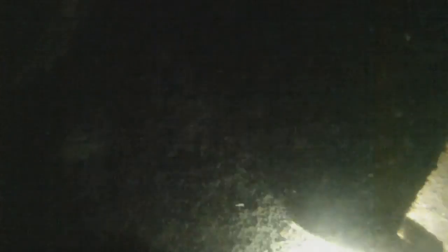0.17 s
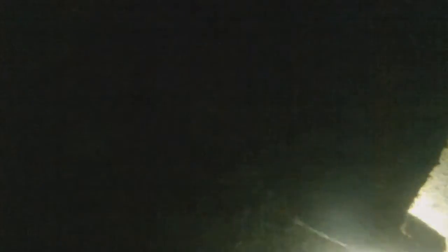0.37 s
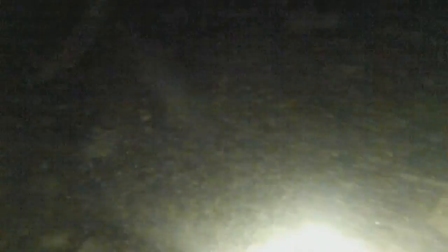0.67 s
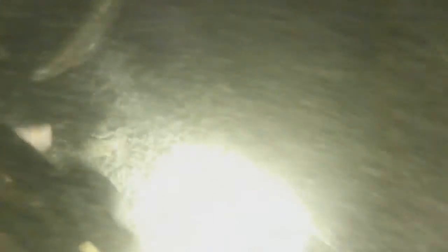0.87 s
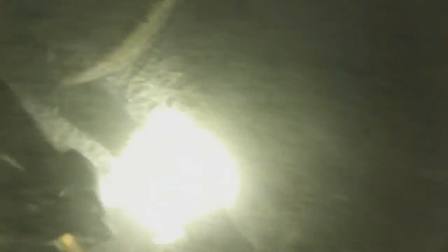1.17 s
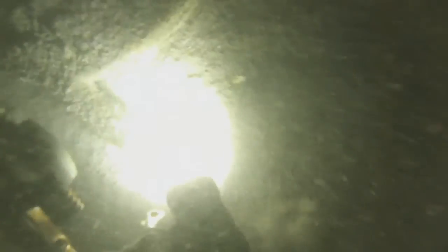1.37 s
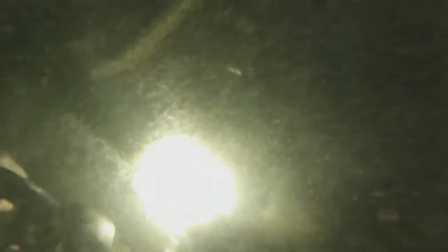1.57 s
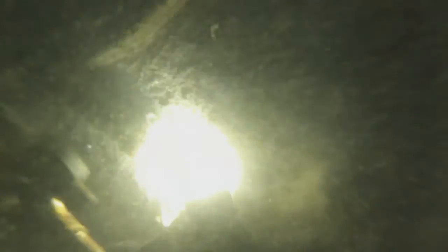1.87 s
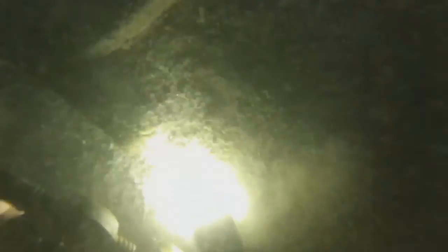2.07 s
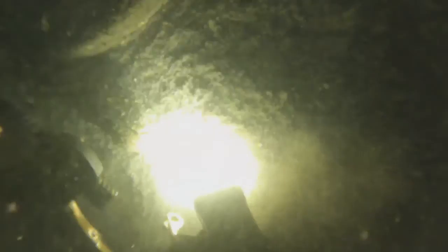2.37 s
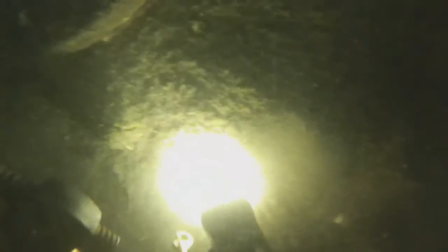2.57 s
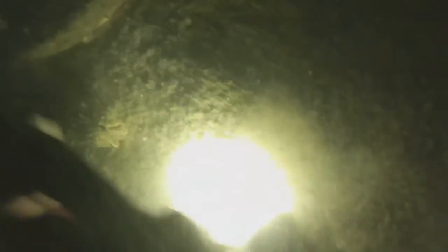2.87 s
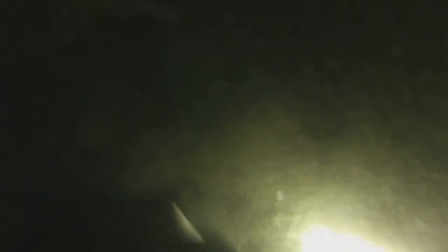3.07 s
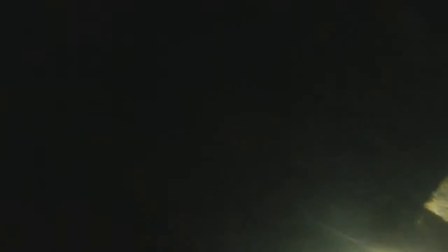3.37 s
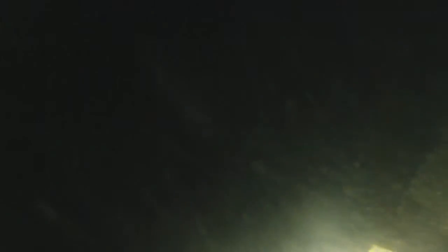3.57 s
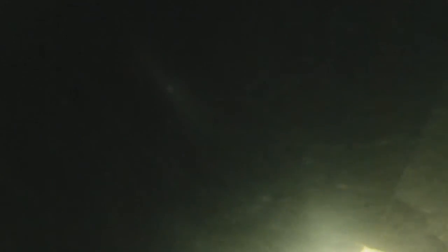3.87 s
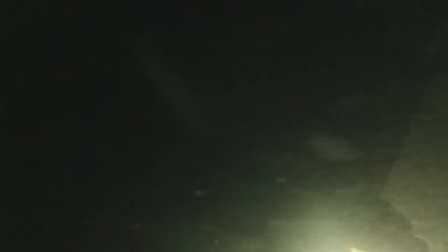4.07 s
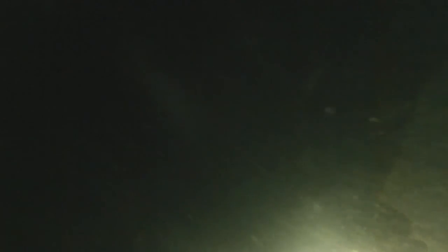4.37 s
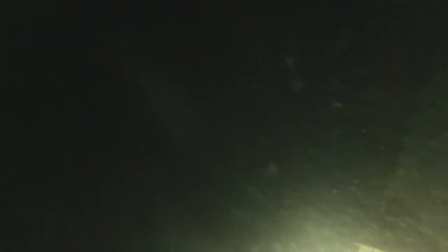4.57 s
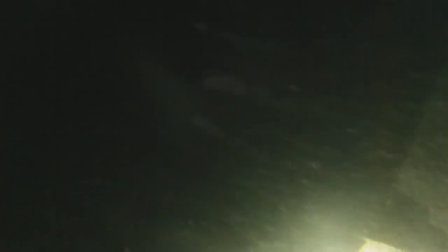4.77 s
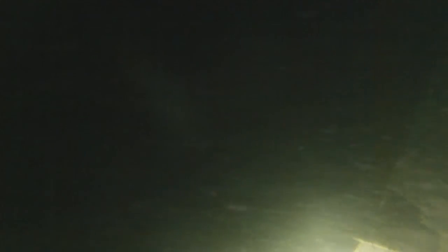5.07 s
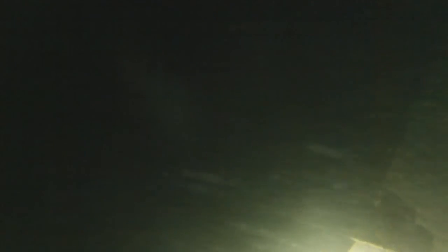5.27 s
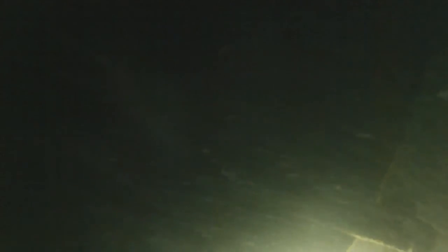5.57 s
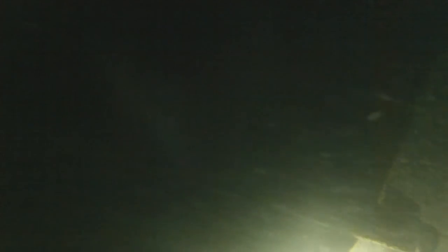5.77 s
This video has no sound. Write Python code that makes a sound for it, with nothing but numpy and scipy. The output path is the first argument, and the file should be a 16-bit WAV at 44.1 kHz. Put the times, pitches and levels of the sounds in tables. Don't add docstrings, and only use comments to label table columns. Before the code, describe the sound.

A small camera in a plastic housing underwater hears low rumbling water, faint hiss and a thin whine. Clips and buckles tick and clink, with hard knocks on the case in the first half. After three seconds the rattling fades to sparse ticks, while water bumps and sways the housing. A crisp snap comes near the end. Everything is very close and dry.

```python
import sys
import numpy as np
from scipy import signal
from scipy.fft import rfft, irfft
from scipy.io import wavfile
from scipy.ndimage import uniform_filter1d

SR = 44100
rng = np.random.default_rng(int(sys.argv[2]) if len(sys.argv) > 2 else 0)


def wav_record(signal):
    frames = np.transpose(np.atleast_2d(signal))
    bounded = np.clip(frames, -1, 1)
    quanta = np.round(bounded * 32767).astype(np.int16)
    wavfile.write(sys.argv[1], SR, quanta)


def boost_factor(decibels):
    exponent = np.asarray(decibels, float) / 20
    return 10 ** exponent


N = 260631

# f/Hz, level per Hz/dB
HISS = [(88, -28.5), (150, -4), (637, -10.5), (1210, -14), (1720, -10), (2140, -16), (2650, -14.5),
        (4580, -17.5), (5050, -17), (5910, -20), (11900, -22.5), (15100, -25.5), (16000, -47)]
# f/Hz, level/dB
WHINE = [(5039, -74.5), (7560, -84), (8823, -85), (11294, -90), (15122, -84.5)]
HISS_DB = -65.5
STRAP_DB, STRAP_STOPS_S, STRAP_FADE_DB_S = -65.5, 0.3, 102
WHINE_IDLE_DB, WHINE_BUSY_DB = -7.0, -1.0
BUSY_S, BUSY_RAMP_S = (0.65, 3.25), 0.614

# t/s, deep push level/dB
PUSH = [(0, -52), (.45, -48), (.65, -55.5), (1.1, -49.5), (2, -43.5), (3, -47), (3.4, -50), (4.1, -52.5),
        (4.5, -49), (5.3, -47.5), (5.91, -57.5)]
SLOSH_DB, SLOSH_FOLLOWS = -64, 1

# f/Hz, level/dB, time to fall 60 dB/s
WALL = [(1306, -1, 0.016), (1497, -3.5, 0.041), (1640, -2.5, 0.033), (1810, -0.5, 0.024),
        (2073, 2.5, 0.023), (2405, 5.5, 0.012), (2750, 4, 0.023)]
# f/Hz, level/dB, time to fall 60 dB/s
LATCH = [(3350, -13, 0.032), (3625, -9, 0.039), (4213, -1.5, 0.025), (4660, -1.5, .015), (5180, 1, 0.017)]
# f/Hz, level/dB, time to fall 60 dB/s
BUCKLE = [(6500, -1, 0.018), (7300, 3.5, 0.015), (7600, -5, 0.0069), (8560, -7, 0.026)]
# f/Hz, level/dB, time to fall 60 dB/s
PIN = [(10250, -13, .012), (11260, 1, .011), (12300, -17, .011), (13950, -8, .018), (14900, -24, .012)]
# lowest f/Hz, highest f/Hz
BANDS_HZ = [(1150, 3200), (3200, 6000), (6000, 9500), (9500, 12200)]

# t/s, length/s, best heard f/Hz, level/dB
SCRAPES = [(0, 0.054, 1470, -63), (0.316, 0.026, 8440, -35.5), (0.405, 0.033, 1670, -28.5),
           (0.442, 0.072, 4230, -58), (0.998, 0.15, 2130, -66), (1.258, 0.13, 4120, -65),
           (1.408, 0.033, 4130, -47), (1.622, 0.089, 4150, -57), (1.828, 0.053, 3940, -56.5),
           (2.007, 0.054, 7300, -50), (2.094, 0.038, 4400, -40), (2.872, 0.02, 2230, -51),
           (2.923, 0.026, 5420, -43.5), (2.924, 0.29, 1920, -68), (3.192, 0.028, 5200, -45.5),
           (3.696, 0.048, 2777, -62.5), (3.858, 0.12, 2814, -67.5), (4.106, 0.062, 3590, -66.5),
           (4.32, 0.083, 2780, -62), (4.639, 0.036, 4300, -76.5), (5.672, 0.05, 1660, -61.5),
           (1.009, 0.06, 3650, -64), (1.04, 0.055, 2190, -62), (1.134, 0.09, 4210, -63.5),
           (1.468, 0.36, 4300, -62), (1.714, 0.12, 8650, -70), (2.117, 0.059, 7500, -61),
           (2.344, 0.19, 4500, -65), (2.522, 0.036, 2400, -50), (2.932, 0.045, 5100, -61),
           (2.977, .035, 2280, -71), (3.055, 0.029, 1880, -73)]

# t/s, f/Hz, swing level/dB, time to fall 60 dB/s
THUDS = [(0.026, 400, -41, 0.0092), (0.417, 100, -32.5, 0.12), (0.42, 445, -27.5, 0.038),
         (1.621, 445, -29.5, 0.064), (1.624, 114, -30.5, 0.078), (1.686, 186, -33.5, 0.17),
         (1.687, 486, -35, 0.05), (1.704, 517, -40, 0.07), (2.088, 480, -30.5, 0.021),
         (2.088, 903, -28.5, 0.063), (2.51, 928, -33, 0.052), (2.111, 317, -31.5, 0.075),
         (2.143, 111.4, -36, 0.21), (2.509, 319, -27.5, 0.067), (2.551, 110.4, -39.5, 0.29),
         (2.911, 294, -28, 0.0084), (2.954, 70.9, -35, 0.16), (3.061, 601, -43.5, 0.06)]
# t/s, f/Hz, swing level/dB
JOLTS = [(0.704, 90.5, -38.5), (1.032, 155, -39), (3.278, 119.6, -37), (3.564, 113.6, -32.5),
         (3.919, 100.4, -38), (4.221, 87.2, -40), (4.445, 129.7, -40.5), (4.792, 128.2, -42.5),
         (4.847, 140, -37), (5.006, 55.7, -28.5), (5.101, 131.5, -26), (5.461, 149.8, -36.5)]
# t/s, swing level/dB, time to fall 60 dB/s
SWAYS = [
    (3.583, -34, 0.33),
    (4.23, -37, 0.15),
    (4.454, -37.5, 0.27),
    (5.26, -37, 0.22),
    (5.396, -39.5, 0.38),
    (5.472, -28.5, 0.42),
]
JOLT_SWINGS, SWAY_HZ = 6.4, 43.9

# t/s, f/Hz, peak level/dB, time to fall 60 dB/s
TAPS = [(.0295, 750, -38, .004), (.031, 1720, -41.5, 0.031), (.0868, 800, -40, 0.0049),
        (.089, 1700, -41.5, .015), (.1135, 600, -57, .005), (.408, 730, -33, 0.025),
        (.4195, 760, -29.5, 0.026), (.4221, 2620, -11, 0.0018), (1.6215, 1223, -16, 0.016),
        (1.629, 2590, -13.5, 0.013), (1.6315, 2000, -19, .015), (1.688, 540, -36, .04),
        (1.7, 596, -45, .06), (1.733, 1700, -45.5, .02), (2.0885, 2610, -3.5, 0.03),
        (2.0892, 2750, -6, 0.014), (2.0335, 3600, -14, .018), (2.0395, 2300, -33, 0.0084),
        (2.0395, 8000, -29, 0.0053), (2.5165, 2650, -12.5, 0.01), (2.884, 7000, -32, .005),
        (2.883, 2700, -31.5, 0.0062), (3.0128, 3300, -23, 0.0094), (2.912, 4500, -29, .004),
        (5.8488, 3200, -27.5, 0.0068), (5.854, 5300, -35, .012), (.3257, 2200, -35.5, 0.021),
        (2.5085, 297, -24, 0.022), (2.5097, 2620, -7, .014), (2.5255, 7800, -40, .006),
        (2.9114, 1470, -19, 0.0025), (2.9238, 7300, -7, .006), (2.9238, 8500, -16, .012),
        (2.9253, 6560, -18, 0.0033), (2.9253, 3440, -22, 0.0083), (2.9345, 6500, -34, .004),
        (2.942, 9500, -42, .003), (2.942, 5000, -33, .004), (2.9565, 9000, -40, .003),
        (2.9565, 5000, -44, .005), (3.0135, 6500, -41, .003), (3.0605, 9500, -32, 0.0033),
        (5.69, 4260, -53.5, 0.024), (5.69, 1690, -52.5, .02), (5.8501, 6700, -7, 0.0058),
        (5.8501, 10400, -21, 0.0079), (5.8503, 4400, -21.5, 0.0079), (5.8715, 7500, -44, 0.016),
        (5.8715, 11100, -49, 0.0099)]

# t/s, best heard f/Hz, wall/dB, latch/dB, buckle/dB
HEAVY = [(0.4166, 6550, -22, -27.5, -27), (0.421, 2780, -21.5, -14.5, -39),
         (1.6181, 5240, -40.5, -36.5, -47), (1.6218, 1338, -12, -19, -36.5),
         (1.624, 11230, -15.5, -18, -13.5), (1.6272, 8450, -15.5, -17.5, -13),
         (1.629, 2600, -13.5, -19.5, -16.5), (1.633, 1900, -18.5, -33.5, -33), (1.645, 4250, -33, -28, -30),
         (2.088, 2767, -1, -5, -11.5), (2.095, 1895, -7, -10.5, -14), (2.102, 1895, -13, -29, -33.5),
         (2.119, 4700, -24.5, -23, -27), (2.5093, 4624, -7.5, -16, -19), (2.5102, 2735, -4.5, -13.5, -29),
         (2.5161, 1820, -8.5, -17, -30), (2.522, 1820, -17, -34, -50), (2.5253, 7700, -20, -40, -39),
         (2.92, 7300, -27.5, -34.5, -35)]
# t/s, best heard f/Hz, wall/dB, latch/dB
LATCH_HITS = [(.389, 7300, -52, -41), (.408, 1640, -26, -28), (.4384, 2600, -28, -30),
              (.4585, 1590, -40, -50), (.4687, 1620, -41, -49), (1.0596, 2950, -38, -33),
              (1.0832, 2190, -49, -40), (1.114, 4160, -25, -21.5), (1.1226, 2210, -24.5, -21.5),
              (1.3935, 4100, -43.5, -40), (1.4005, 3600, -53, -42), (1.409, 4300, -62, -41),
              (1.8361, 3500, -40.5, -40.5), (2.0322, 7500, -33, -23.5), (2.2467, 4430, -40, -31.5),
              (2.2573, 4700, -39, -44), (2.2802, 1637, -44, -57.5), (2.934, 2745, -29.5, -36),
              (2.9535, 5100, -71, -40.5), (2.9807, 3100, -36, -45), (2.9956, 3930, -36, -41),
              (3.0135, 3080, -25.5, -37.5), (3.0655, 1820, -40, -48), (3.0826, 2070, -30, -28),
              (3.09, 4200, -44.5, -38), (3.1981, 5180, -40, -31), (3.339, 7250, -40, -37.5),
              (3.358, 4270, -48.5, -43), (3.4534, 4300, -45.5, -32), (4.1739, 3637, -45.5, -37)]
# t/s, best heard f/Hz, wall/dB, buckle/dB
BUCKLE_HITS = [(.3018, 5250, -56, -31.5), (.31, 8100, -51, -38), (.3169, 5200, -58, -25),
               (.3272, 11640, -47, -15.5), (.4354, 1606, -30, -46), (.4795, 10700, -46, -35),
               (.5201, 7180, -35, -22.5), (.9923, 6300, -42.5, -28), (1.0715, 2130, -58, -44),
               (1.1313, 8580, -54, -32), (1.4205, 8520, -34.5, -21), (1.4372, 8500, -47, -31.5),
               (1.671, 8620, -46, -37), (1.6872, 2600, -39, -40), (1.8434, 8700, -61, -29.5),
               (1.8476, 8610, -61, -28), (2.0045, 8600, -65, -29.5), (2.0168, 8600, -46.5, -27.5),
               (2.028, 3530, -39.5, -20.5), (2.1434, 7730, -46, -45.5), (2.9225, 7510, -36, -20.5),
               (3.06, 1745, -34, -43), (3.4682, 6845, -38, -28), (3.9378, 8620, -60, -36)]
# t/s, best heard f/Hz, wall/dB
WALL_TICKS = [(.0311, 1700, -48), (.0863, 1690, -56), (.115, 1740, -60), (1.0953, 2270, -54),
              (1.1752, 2520, -45.5), (1.2856, 2960, -62), (1.2913, 3120, -48.5), (1.3334, 2440, -47.5),
              (1.3602, 1550, -49), (1.562, 1664, -43.5), (3.116, 2350, -42.5), (3.7128, 7600, -52),
              (4.2156, 1496, -47.5), (4.345, 2750, -51), (5.6841, 2110, -50)]
# t/s, best heard f/Hz, fittings/dB
GEAR_TICKS = [(.5106, 8670, -40), (1.3115, 5510, -46), (1.535, 7470, -49), (1.583, 4900, -44),
              (1.7326, 3580, -47.5), (1.7823, 4213, -53), (1.8252, 3650, -44.5), (2.0737, 4290, -39),
              (2.1963, 5000, -48), (2.2414, 5030, -48.5), (2.357, 7700, -49.5), (2.407, 4980, -46),
              (2.4459, 7800, -43), (2.495, 7700, -50.5), (2.545, 10500, -49), (2.687, 7670, -48.5),
              (2.747, 3640, -50.5), (2.793, 4370, -50), (3.071, 5790, -47.5), (3.2423, 5500, -47),
              (3.3876, 7350, -48), (3.855, 5180, -46), (4.082, 5110, -50.5), (4.16, 7430, -44.5),
              (4.6618, 7540, -50)]
# t/s, best heard f/Hz, wall/dB, latch/dB, buckle/dB
SNAPS = [(0.4221, 1640, -16, -11.5, -5), (0.451, 11240, -44.5, -43, -33.5),
         (0.6034, 7480, -56, -47.5, -38.5), (1.661, 5480, -36, -33.5, -48), (1.693, 2000, -36, -40, -37),
         (1.7054, 4620, -41.5, -48, -50), (1.7637, 8660, -51, -41.5, -34),
         (1.8056, 6700, -71.5, -51, -39.5), (1.8534, 11270, -45, -36.5, -31.5),
         (1.869, 11130, -53, -43, -39.5), (2.078, 4160, -43.5, -42.5, -39), (2.4199, 4530, -64, -44, -45),
         (2.697, 4270, -45, -42, -57), (2.885, 5120, -32, -28.5, -34.5), (2.9113, 4780, -26, -25.5, -37),
         (5.8502, 7120, -37, -31, -14.5)]
LATCH_LED_DB, BUCKLE_LED_DB = (0.5, -5.5, -14.5), (-7, -2, -5.5)
# wall/dB, latch/dB, buckle/dB, pin/dB
WALL_TICK_DB = (0.0, -13, -15, -25)
# wall/dB, latch/dB, buckle/dB, pin/dB
GEAR_TICK_DB = (-9, -1.5, -3, -11.5)
SNAP_PIN_DB, HEAVY_PIN_DB = -9, -12
PIN_STRUCK_DB = 15.5
SNAP_CHATTER_S, SNAP_RING, SNAP_TAIL_DB = 0.0006, 0.66, -21.5
HEAVY_CHATTER_S, HEAVY_RING, HEAVY_TAIL_DB = 0.0018, 0.84, -6.5
LIGHT_TILT = 0.8
STRAY_COUNT, STRAY_DB = 45, -54.5

# t/s, f/Hz, peak
# level/dB, time to fall 60 dB/s
RINGS = [(.301, 8635, -39, .08), (1.407, 8700, -39, .08), (.302, 3625, -46, .08), (0.324, 3625, -20, 0.053),
         (0.424, 1495, -39, 0.26), (0.424, 1590, -36.5, 0.19), (0.44, 8650, -33, 0.077),
         (.523, 3670, -27, 0.037), (1.062, 2800, -31, 0.039), (1.421, 8640, -27, 0.07),
         (1.421, 2166, -33, 0.063), (1.423, 3680, -20, 0.03), (1.672, 8620, -36.5, 0.073),
         (1.847, 8560, -22, 0.048), (2.935, 2766, -22, 0.035), (3.014, 2750, -23, 0.043),
         (3.2, 2200, -42.5, 0.081), (3.2, 3530, -49, 0.1), (3.199, 8640, -36, 0.057),
         (.388, 2300, -44, 0.027), (.388, 4300, -49, .02), (.441, 3620, -31.5, 0.047),
         (1.07, 8900, -38, 0.021), (1.175, 2480, -58.5, 0.045), (1.283, 2910, -44.5, 0.072),
         (1.31, 4360, -61, .12), (1.31, 5500, -52, 0.045), (1.333, 2470, -39, 0.023),
         (1.36, 1700, -43, 0.049), (1.641, 3600, -27, 0.042), (2.879, 5240, -30, 0.027),
         (3.86, 2720, -49, 0.032), (3.874, 2730, -57, .03), (3.903, 2700, -56.5, 0.14),
         (3.94, 2170, -50, .05), (3.94, 3600, -63, 0.055), (4.094, 7400, -50, 0.028),
         (4.112, 2770, -53, .03), (4.128, 2750, -45, 0.038), (4.133, 8600, -50, 0.054),
         (4.174, 3686, -42, 0.044), (4.342, 2770, -46.5, 0.055), (4.359, 2750, -53.5, 0.047),
         (4.381, 2730, -46.5, 0.052), (4.356, 7500, -51.5, 0.035), (1.849, 3640, -35.5, 0.058),
         (3.098, 2170, -46, 0.058), (3.39, 7500, -48.5, 0.046), (3.39, 3620, -48, 0.046),
         (3.455, 2070, -40, 0.028),
         (.421, 1270, -12, 0.027), (.42, 2754, -9, 0.034), (1.62, 1485, -13, 0.038),
          (1.62, 1264, -15, 0.039), (1.629, 1620, -21.5, 0.054), (2.089, 2800, -5.5, 0.05),
          (2.149, 2750, -48, 0.066), (2.51, 2090, -6.5, 0.031), (2.515, 2310, -25, 0.011),
          (2.88, 2450, -25, 0.024), (3.083, 2110, -29, 0.025), (3.7, 692, -54, 0.07),
          (5.85, 2690, -18.5, 0.011), (1.422, 11600, -36, .025)]


def curve(table, col):
    rows = np.array(table)
    return np.interp(np.arange(N) / SR, rows[:, 0], rows[:, col])


def band(x, lo_hz, hi_hz, order=2):
    return signal.sosfilt(signal.butter(order, [lo_hz, hi_hz], "bandpass", fs=SR, output="sos"), x)


def noise_band(lo_hz, hi_hz, order=2, count=N):
    return unit(band(rng.standard_normal(count), lo_hz, hi_hz, order))


def unit(x):
    return x / np.sqrt(np.mean(x ** 2))


def add(out, s, x):
    i = max(int(s * SR), 0)
    out[i:i + len(x)] += x[:N - i]


def walk(rate):
    k = int(SR / rate)
    held = np.repeat(rng.standard_normal(N // k + 1), k)
    return unit(uniform_filter1d(uniform_filter1d(held, k), k)[:N])


def ring(hz, t60, rise_s, phase, count):
    t = np.arange(count) / SR
    fade = np.exp(-np.log(1000) * t / t60)
    return (1 - np.exp(-t / rise_s)) * fade * np.sin(2 * np.pi * hz * t + phase)


def camera():
    t = np.arange(N) / SR
    hz = np.maximum(np.fft.rfftfreq(N, 1 / SR), 1)
    hiss_hz, hiss_db = np.transpose(HISS)
    colour = boost_factor(np.interp(np.log(hz), np.log(hiss_hz), hiss_db))
    hiss = irfft(rfft(rng.standard_normal(N)) * colour, N)
    hiss = hiss / np.std(band(hiss, 1000, 15000, order=4))
    hiss = boost_factor(HISS_DB) * hiss

    whine = sum(boost_factor(db + 4.5 + 1.5 * walk(31)) * np.sin(2 * np.pi * f * t) for f, db in WHINE)
    busy = np.clip(np.minimum(t - BUSY_S[0], BUSY_S[1] - t) / BUSY_RAMP_S + 0.5, 0, 1)
    whine_db = 1.5 + WHINE_IDLE_DB + busy * (WHINE_BUSY_DB - WHINE_IDLE_DB)

    strap_db = STRAP_DB - STRAP_FADE_DB_S * np.maximum(t - STRAP_STOPS_S, 0) + 2.0 * walk(35)
    return hiss + boost_factor(whine_db) * whine + boost_factor(strap_db) * noise_band(7060, 7260)


def water():
    surge_db = 1.6 * walk(7)
    push_db = curve(PUSH, col=1)
    push = noise_band(24, 50) + boost_factor(-1.5) * noise_band(6, 30)
    slosh = noise_band(47, 160) + boost_factor(-7.5) * noise_band(180, 240)
    slosh_db = SLOSH_DB + SLOSH_FOLLOWS * (push_db + 50) + 1.2 * surge_db + 2.5 * walk(25)
    return boost_factor(push_db - 3.5 + surge_db) * push + boost_factor(slosh_db) * slosh


def scrapes(width=0.12):
    grains = rng.standard_normal(N) * boost_factor(4.5 * walk(250))
    modes = WALL[1::2] + WALL[-1:] + LATCH + BUCKLE[1::2] + PIN[1::2]
    parts = np.zeros(N)
    for hz, db, _ in modes:
        mode_db = db - 0.72 * np.log2(hz / 2700)
        parts += boost_factor(mode_db) * band(grains, hz * (1 - width), hz * (1 + width), order=1)
    parts = unit(parts)
    out = np.zeros(N)
    for s, length_s, best_hz, db in SCRAPES:
        span = slice(int(s * SR), int((s + length_s) * SR))
        best = band(grains[span], best_hz * 0.975, best_hz * 1.025, order=1)
        best = best / np.std(grains) * np.sqrt(SR / best_hz * 5.0)
        swell = np.sqrt(np.hanning(len(best)))
        add(out, s, boost_factor(db) * swell * (parts[span] + boost_factor(3.5) * best))
    return out


def bumps(count=9000):
    out = np.zeros(N)
    t = np.arange(count) / SR
    jolts = [(s, hz, db, JOLT_SWINGS / hz) for s, hz, db in JOLTS]
    sways = [(s, SWAY_HZ, db, t60) for s, db, t60 in SWAYS]
    for s, hz, db, t60 in THUDS + jolts + sways:
        grit_fade = boost_factor(-3.5 - 60 * t / (2.22 * t60)) * (1 - np.exp(-t * hz * 3.6))
        grit = noise_band(hz * 0.49, hz * 1.4, order=3, count=count) * grit_fade
        swing = ring(hz, t60, 0.0012, 0, count)
        add(out, s, boost_factor(db) * (swing + min(hz / 350, 1) * grit))
    return out


def taps():
    out = np.zeros(N)
    for s, hz, db, t60 in TAPS:
        add(out, s, boost_factor(db) * ring(hz, t60, 0.0002, 0, count=4000))
    return out


def with_pin(row, pin_db):
    struck = row[1] > BANDS_HZ[3][0]
    return (*row, row[-1] + pin_db + PIN_STRUCK_DB * struck)


def touches():
    for row in HEAVY:
        yield (HEAVY_CHATTER_S, *with_pin(row, HEAVY_PIN_DB))
    for rows, share_db in ((LATCH_HITS, LATCH_LED_DB), (BUCKLE_HITS, BUCKLE_LED_DB)):
        for s, hz, wall_db, db in rows:
            yield (0.004, s, hz, wall_db, *(db + np.array(share_db)))
    for rows, share_db in ((WALL_TICKS, WALL_TICK_DB), (GEAR_TICKS, GEAR_TICK_DB)):
        for s, hz, db in rows:
            yield (0.004, s, hz, *(db + np.array(share_db)))
    for row in SNAPS:
        yield (SNAP_CHATTER_S, *with_pin(row, SNAP_PIN_DB))
    favourites = [hz for hz, *_ in WALL[2::4] + LATCH[1:3] + BUCKLE[1:2]]
    for when, which, *mix in rng.random((STRAY_COUNT, 6)):
        best_hz = favourites[int(which * len(favourites))]
        yield (SNAP_CHATTER_S, when * N / SR, best_hz, *(STRAY_DB - 9.9 * np.array(mix)))


def contact(chatter_s, count):
    when, size = rng.random((2, count))
    blows = np.zeros(int(0.01 * SR))
    np.add.at(blows, (np.minimum(when * chatter_s, 0.009) * SR).astype(int), size * (1 - 0.54 * when))
    blows[0] += 1.1
    return blows


def struck_part(modes, lo, hi, bed, chatter_s, s, best_hz, light_db, count=2400):
    t = np.arange(count) / SR
    hz, db, t60 = np.transpose(modes)[:, :, None]
    snap, heavy = chatter_s == SNAP_CHATTER_S, chatter_s == HEAVY_CHATTER_S
    t60 = t60 * SNAP_RING ** snap * HEAVY_RING ** heavy
    db = db + light_db * np.log2(hz / hz[-1])
    lo = min(lo * boost_factor(light_db / 2), hi / 1.3)

    gain, tune, phase = rng.standard_normal((3,) + hz.shape)
    body = boost_factor(db + 2.0 * gain) * ring(hz * (1 + 0.016 * tune), t60, 0.0001, np.pi * phase, count)
    body = body.sum(axis=0) / np.sqrt(len(modes))
    if lo <= best_hz < hi:
        best_t60 = 0.99 * t60[np.argmin(np.abs(hz - best_hz))]
        body = body + ring(best_hz, best_t60, 0.00084, 0, count)

    noise = np.take(bed, int(s * SR) + np.arange(count), mode="wrap")
    if light_db:
        noise = unit(band(noise, lo, hi))
    crack = boost_factor(-5.5 - 60 * t / 0.005)
    tail = boost_factor(-32.0 + SNAP_TAIL_DB * snap + HEAVY_TAIL_DB * heavy - 60 * t / 0.035)
    fade = (crack + tail) * (1 - np.exp(-t * lo / 0.92))
    return body / np.abs(body).max() + noise * fade


def knocks():
    out = np.zeros(N)
    beds = [noise_band(lo, hi, order=3) for lo, hi in BANDS_HZ]
    for chatter_s, s, best_hz, *parts_db in touches():
        blows = contact(chatter_s, count=5)
        wall_light_db = LIGHT_TILT * max(parts_db[1] - parts_db[0], 0)
        for modes, (lo, hi), bed, part_db in zip((WALL, LATCH, BUCKLE, PIN), BANDS_HZ, beds, parts_db):
            light_db = wall_light_db * (modes is WALL)
            one_blow = struck_part(modes, lo, hi, bed, chatter_s, s, best_hz, light_db)
            part = signal.fftconvolve(one_blow, blows)
            add(out, s - 0.0005, part / np.abs(part).max() * boost_factor(part_db + 2.0))
    highpass = signal.butter(3, 1100, "highpass", fs=SR, output="sos")
    return signal.sosfilt(highpass, out) + boost_factor(1.5) * band(out, 230, 590)


def rings():
    out = np.zeros(N)
    for s, hz, db, t60 in RINGS:
        add(out, s, boost_factor(db) * ring(hz, t60, 0.002, 0, count=12000))
    return out


def scene():
    mono = camera() + water() + scrapes() + bumps() + taps() + knocks() + rings()
    return np.array([mono, mono])


def band_limit(x):
    return signal.sosfilt(signal.butter(12, 16600, fs=SR, output="sos"), x)


def record(dry):
    mid = np.clip(np.tanh(dry[0] * 0.69) / 0.71, -1, 1)
    side = boost_factor(-40.5) * mid * (walk(400) + 1.2 * walk(3000))
    side += boost_factor(-41.5) * band(mid, 1200, 15000) * walk(5000)
    side += boost_factor(-73.5) * band(rng.standard_normal(N), 2500, 12000)
    return band_limit(np.array([mid + side, mid - side]))


dry = scene()
out = record(dry)
wav_record(out)
```